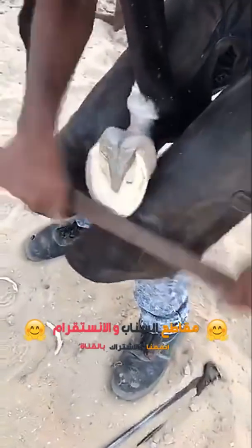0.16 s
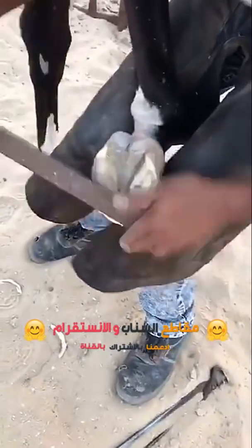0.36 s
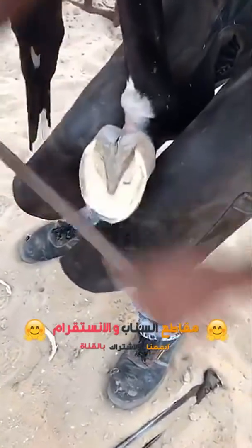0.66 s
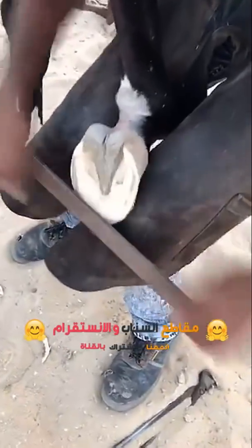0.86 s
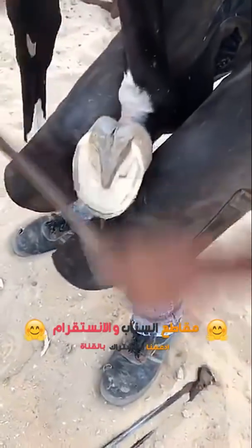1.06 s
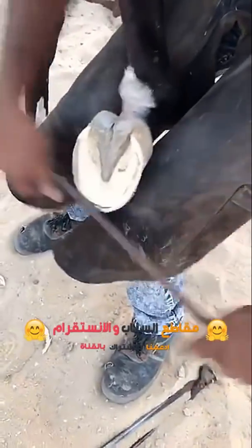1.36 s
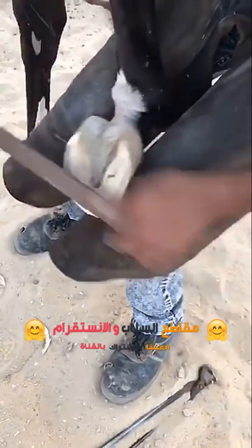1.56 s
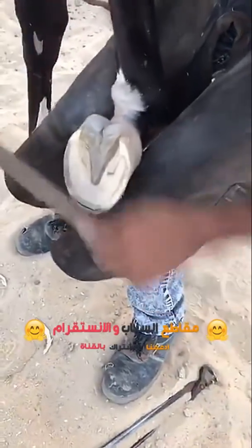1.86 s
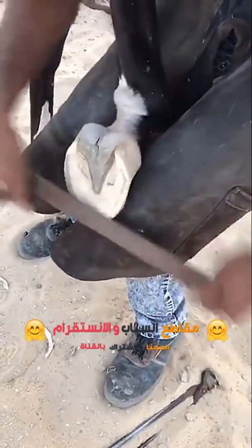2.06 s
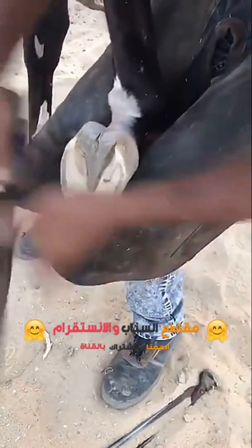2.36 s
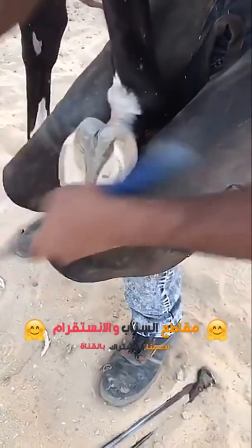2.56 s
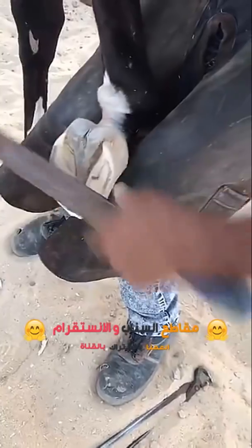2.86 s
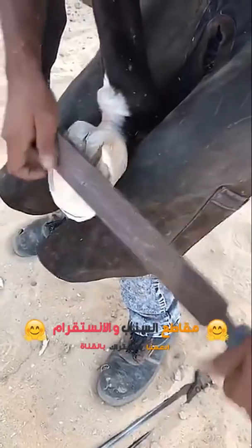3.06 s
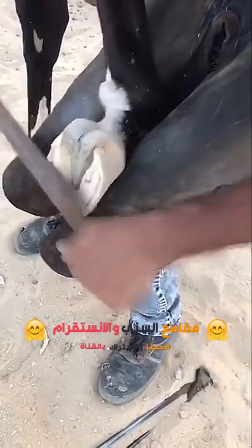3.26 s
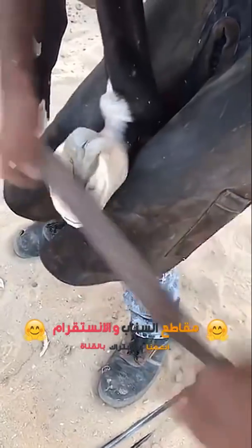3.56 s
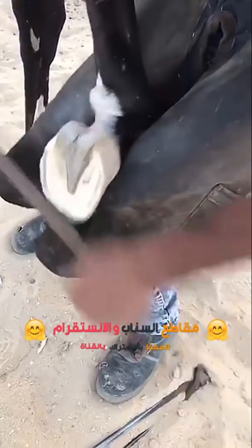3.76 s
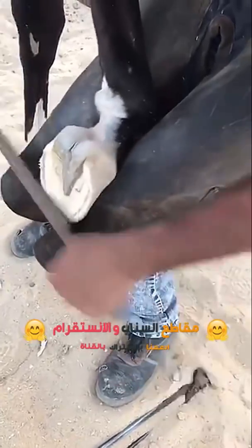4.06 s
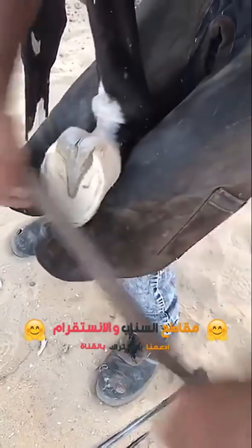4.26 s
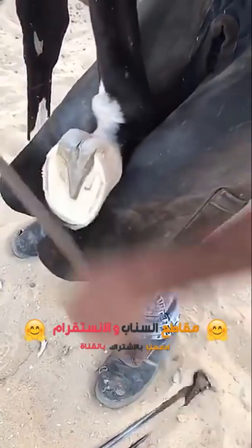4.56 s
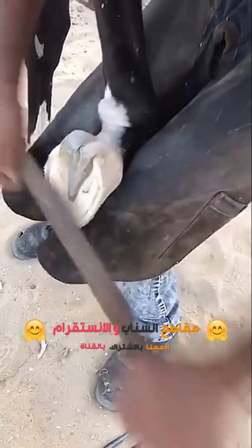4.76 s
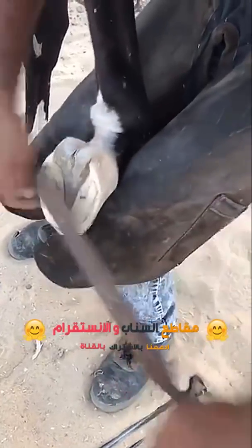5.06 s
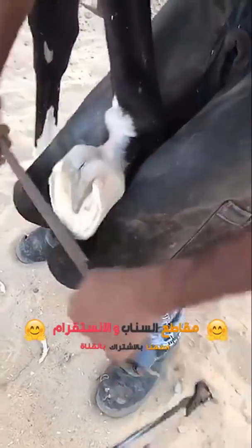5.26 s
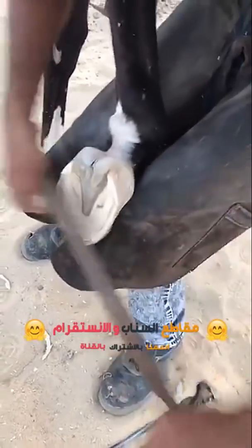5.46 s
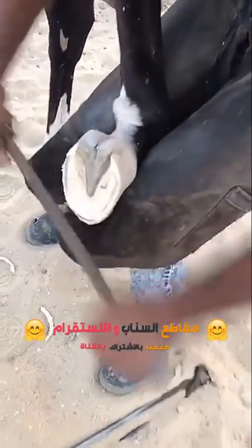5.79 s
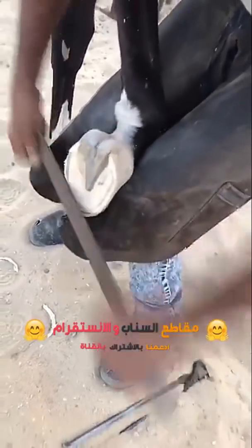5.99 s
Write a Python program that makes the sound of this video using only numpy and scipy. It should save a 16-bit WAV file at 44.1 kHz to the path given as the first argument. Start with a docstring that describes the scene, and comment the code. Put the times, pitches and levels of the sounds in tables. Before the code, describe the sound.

A long steel rasp scrapes a horse's hoof in short, crunchy, evenly spaced strokes while gusty wind rumbles and thumps against the microphone outdoors.

```python
"""Outdoors, close to a phone: a farrier levels a horse's hoof with a long flat rasp, six strokes, a pause, eight more.
Rows of teeth chip the horn as coloured noise and ring the bar's decaying modes; brief sines make it squeal.
Noise bursts give the ticks of steel and dull knocks on the apron; soft swells of noise are rubbing hands and tool.
Wind is ragged low noise in gusts, with single slaps on the microphone, over a faint open-air hiss."""
import sys
import numpy as np
from scipy import signal
from scipy.fft import rfft, irfft, next_fast_len
from scipy.io import wavfile
from scipy.ndimage import uniform_filter1d

SR = 44100
rng = np.random.default_rng(int(sys.argv[2]) if len(sys.argv) > 2 else 0)


def generate_wav(signal):
    """Clip the signal to [-1, 1] and save it as 16-bit WAV at the path in sys.argv[1]."""
    frames = np.transpose(np.atleast_2d(signal))
    scaled = np.clip(frames, -1, 1) * 32767
    pcm = np.round(scaled).astype(np.int16)
    wavfile.write(sys.argv[1], SR, pcm)


N = 270313  # length in samples
TIME = np.arange(N) / SR  # s
REGRIP_S = 2.6  # the second grip begins


def undb(db):
    """Decibels to gain."""
    return 10 ** (np.asarray(db) / 20)


def unit(x):
    """Scale to rms 1."""
    return x / np.sqrt(np.mean(x ** 2))


def white():
    """White noise as long as the scene."""
    return rng.standard_normal(N)


def colour(x, points):
    """Filter by a spectrum of (f/Hz, level/dB) points, joined along log frequency."""
    hz, db = np.transpose(points)
    size = next_fast_len(len(x) + 4096)
    bins = np.arange(size // 2 + 1) * SR / size
    gain = undb(np.interp(np.log(bins + 1), np.log(hz), db))
    return irfft(rfft(x, size) * gain, size)[:len(x)]


def part(x, hz, kind):
    """The lows or highs of x, without phase shift."""
    sos = signal.butter(4, hz, kind, fs=SR, output="sos")
    return signal.sosfiltfilt(sos, x)


def walk(rate):
    """Smooth chance of spread 1 that changes rate times a second."""
    step = max(int(SR / rate), 2)
    values = rng.standard_normal(N // step + 1)
    return unit(uniform_filter1d(np.repeat(values, step)[:N], step))


def ring(x, hz, t60):
    """One decaying mode driven by x; white noise keeps its power."""
    pole = np.exp((2j * np.pi * hz - np.log(1000) / t60) / SR)
    return signal.lfilter([1], [1, -pole], x).real * np.sqrt(2 * (1 - abs(pole) ** 2))


def add(out, s, x):
    """Mix x into out from time s on."""
    i = max(int(s * SR), 0)
    out[i:i + len(x)] += x[:N - i]


def burst(decay_s):
    """A short crack of noise with an exponential decay."""
    t = TIME[:SR // 10]
    return rng.standard_normal(len(t)) * np.exp(-t / decay_s)


# gusts on the microphone: [peak t/s, rise/s, fall/s, rumble level/dB, small-eddy level/dB before the wind's trim]
GUST_LIST = [(0.13, 0.045, 0.15, -26, -41.5), (0.283, 0.056, 0.073, -21.5, -33),
             (0.407, 0.024, 0.043, -17, -26), (0.57, 0.15, 0.063, -24.5, -37.5),
             (0.702, 0.015, 0.13, -26.5, -28.5), (0.819, 0.028, 0.028, -18.5, -39),
             (0.98, 0.083, 0.063, -18.5, -31), (1.02, 0.023, 0.067, -22, -33),
             (1.168, 0.044, 0.013, -24.0, -29), (1.28, 0.051, 0.12, -25, -40.5),
             (1.449, 0.083, 0.046, -25, -25.5), (1.566, 0.16, 0.061, -22.5, -28.5),
             (1.658, 0.022, 0.018, -22.5, -54.5), (1.881, 0.079, 0.02, -24.5, -31.5),
             (2.027, 0.084, 0.084, -25.5, -30.5), (2.215, 0.011, 0.02, -13.5, -28.5),
             (2.473, 0.084, 0.023, -24, -38), (2.53, 0.01, 0.042, -21.5, -39),
             (2.709, 0.14, 0.1, -23.5, -37), (2.754, 0.1, 0.036, -35.5, -25.5),
             (2.988, 0.024, 0.081, -23.5, -30), (3.097, 0.011, 0.035, -22.5, -31.0),
             (3.221, 0.036, 0.11, -22.5, -34.5), (3.364, 0.031, 0.062, -24.5, -44),
             (3.711, 0.076, 0.21, -32.5, -39.5), (3.875, 0.034, 0.083, -19.5, -37),
             (4.009, 0.032, 0.059, -22, -27.5), (4.077, 0.034, 0.036, -22, -30),
             (4.173, 0.013, 0.024, -28, -22.5), (4.286, 0.044, 0.023, -11.5, -21.5),
             (4.374, 0.062, 0.039, -25.5, -31.5), (4.501, 0.032, 0.051, -21, -33),
             (4.685, 0.035, 0.074, -20.5, -31), (4.827, 0.022, 0.047, -24, -31.5),
             (5.005, 0.039, 0.056, -21.5, -24), (5.135, 0.049, 0.065, -17, -24),
             (5.32, 0.083, 0.15, -32.5, -47), (5.429, 0.015, 0.084, -18.5, -23.5),
             (5.585, 0.035, 0.093, -19, -26), (5.731, 0.045, 0.051, -20, -31),
             (5.887, 0.076, 0.09, -19, -22.5), (6.009, 0.048, 0.071, -24.5, -32.5)]


def gusts(shape=2.21, lull_rumble_db=-35.5, lull_eddy_db=-54):
    """Gusts rise and fall over a light breeze, their powers adding: dB of the rumble and of the small eddies."""
    rumble, eddies = undb(lull_rumble_db) ** 2, undb(lull_eddy_db) ** 2
    for s, rise_s, fall_s, rumble_db, eddy_db in GUST_LIST:
        # shape 1 is a sharp peak, 2 a round bell
        swell = np.exp(-np.abs((TIME - s) / np.where(TIME < s, rise_s, fall_s)) ** shape)
        rumble = rumble + (undb(rumble_db) * swell) ** 2
        eddies = eddies + (undb(eddy_db) * swell) ** 2
    return 10 * np.log10(rumble), 10 * np.log10(eddies)


def turbulence(spectrum, hold_s, patchy_db, patch_rate, steady=0.99):
    """Ragged pressure swings of the given colour, of similar strength from one moment to the next."""
    x = colour(white() * undb(patchy_db * walk(patch_rate)), spectrum)
    hold = int(hold_s * SR)
    power = np.abs(uniform_filter1d(uniform_filter1d(x ** 2, hold), hold)) + 1e-18
    return unit(x / power ** (steady / 2))


# relative spectra of large, small and finest eddies: [f/Hz, level/dB]
RUMBLE_COLOUR = [(15, -20), (30, 1.5), (50, 5.5), (80, 0), (120, -6.5), (180, -16.5), (300, -35.5),
                 (600, -71), (2400, -130)]
EDDY_COLOUR = [(60, -30.5), (130, 4.5), (220, 2.5), (350, -5), (550, -17.5), (900, -34.5), (1500, -55),
               (4000, -110)]
FLUTTER_COLOUR = [(150, 0.5), (400, 15.5), (700, 1.5), (1200, -17.5), (1800, -18.5), (2600, -54),
                  (5000, -100)]


def wind(eddy_trim_db=0.5, hard_gust_db=-23, flutter_db=-34, growth=2.4):
    """Large eddies rumble; small ones come in ragged clusters, and the finest stand out in the hardest gusts."""
    rumble_db, eddy_db = gusts()
    rumble = turbulence(RUMBLE_COLOUR, hold_s=0.027, patchy_db=3.5, patch_rate=50)
    eddies = turbulence(EDDY_COLOUR, hold_s=0.043, patchy_db=6, patch_rate=130)
    flutter = turbulence(FLUTTER_COLOUR, hold_s=0.012, patchy_db=5, patch_rate=200)
    # flutter grows 2.4 dB for each dB of gust, reaching flutter_db in a gust of hard_gust_db
    flutter_gain = undb(flutter_db + growth * (eddy_db - hard_gust_db))
    return rumble * undb(rumble_db) + eddies * undb(eddy_db + eddy_trim_db) + flutter * flutter_gain


# relative spectrum of the open air: [f/Hz, level/dB]
AIR_COLOUR = [(120, 10), (250, -8.5), (450, 2.5), (700, 4.5), (1000, -8), (1500, -7), (2300, -11.5),
              (3400, -12.5), (5000, -17), (10000, -21.5), (15000, -30.5)]


def air(level_db=-54.5):
    """Faint, steady open-air hiss of coloured noise."""
    return unit(colour(white(), AIR_COLOUR)) * undb(level_db)


# pushes of the rasp, levels relative: [start t/s, length/s, mid-stroke level/dB, arch: drop at both ends/dB,
# lean toward the end/dB, fine dust hiss/dB, hoof body/dB]
PUSHES = [(0.127, .15, -39, 4, 6, -4, 2.5), (.532, .11, -39, 4.5, 2, 1.5, 1),
          (0.912, 0.099, -40.5, 1.5, 0, 2, -3), (1.289, 0.12, -40, 0, 5.5, 4, -6.5),
          (1.695, .11, -38, 3, 2.5, 0.5, -6), (2.062, 0.15, -41.5, 6.5, 0, -2, -1.5),
          (3.247, 0.12, -31, 7, 6, -2.5, 2), (3.682, 0.098, -30, 0.5, 2.5, -8, -0.5),
          (4.079, 0.1, -34, 6, -1.2, 2, 0), (4.469, .111, -33.5, 2.5, -0.5, -1, -1.5),
          (4.862, 0.1, -36.5, 4.5, 0, -0.5, 0), (5.26, 0.13, -37.5, 6, -3, -3, 0),
          (5.665, .12, -38.5, 5, 0.5, 2.5, 1), (6.067, 0.11, -43, 3, 2, -1.5, 3.5)]


def arm(ragged_db=1.35, ragged_rate=55, touch_s=0.033, touch_ramp_s=.005, bite_db_per_s=593, lift_db_per_s=492):
    """Each push bites, swells in an arch and lifts off: pressure, travel 0-1, and the dust and body dB of its angle."""
    push, travel, dust, body = np.zeros((4, N))
    for start, length, db, arch_db, lean_db, dust_db, body_db in PUSHES:
        on = (TIME > start - .08) & (TIME < start + length + .1)
        t = TIME[on] - start
        travel[on] = np.clip(t / length, 0, 1)
        along = 2 * travel[on] - 1  # -1 at the start of the push, 1 at its end
        edges = bite_db_per_s * np.maximum(-t, 0) + lift_db_per_s * np.maximum(t - length, 0)
        # steel first meets horn touch_s before the cut starts
        touching = np.clip((t + touch_s) / touch_ramp_s, 0, 1)
        push[on] = touching * undb(db + lean_db * along - arch_db * along ** 2 - edges)
        dust[on], body[on] = dust_db, body_db
    return push * undb(ragged_db * walk(ragged_rate)), travel, dust, body


def teeth(speed, row_hz=1050, uneven=.09, chip_db=0.5, row_share=0.21, chatter_db=0.6):
    """Rows of teeth pass faster with the arm's speed; each row breaks off chips of random size."""
    phase = np.cumsum(row_hz * speed * (1 + uneven * walk(300))) / SR  # in rows passed
    rows = np.diff(np.floor(phase), prepend=0) * undb(chip_db * walk(1500))
    chips = white() * undb(chip_db * walk(2500)) * np.exp(-(phase % 1) / 0.77)
    grind = row_share * unit(rows - rows.mean()) + unit(chips)
    return grind * undb(chatter_db * walk(170))


def slide(force, travel, start_s=.0022, end_s=0.0012, echo=0.28):
    """Each bite returns from the end of the bar, sooner as the stroke goes on, so the colour sweeps upward."""
    lag = start_s + (end_s - start_s) * travel
    source = np.maximum(np.arange(N) - (lag * SR).astype(int), 0)
    return force + echo * force[source]


def shifting(force, size=1024, spread_db=2.4):
    """The contact patch keeps changing, so narrow bands of the scrape swell and sink on their own."""
    cells = signal.stft(force, nperseg=size)[2]
    drift = rng.standard_normal(cells.shape)
    for axis in (0, 1):  # smooth over frequency, then time
        drift = uniform_filter1d(drift, size=6, axis=axis)
    return signal.istft(cells * undb(spread_db * unit(drift)), nperseg=size)[1][:N]


# bending modes of the steel bar: [f/Hz, t60/s, relative level/dB in the first grip, the same in the second grip]
BAR_MODES = [(1390, 0.033, -8, -9.5), (1624, .02, -24, -2), (2204, 0.048, -24, -15),
             (2735, 0.042, -4.5, -6.5), (3375, 0.035, 0.5, -1), (4325, 0.031, 1, -3.5),
             (5385, 0.038, -2, -1), (5497, 0.041, -2, -5), (6490, 0.028, -3, -1), (7800, 0.023, -13, -10),
             (9100, .02, -15, -13), (11700, .08, -9.5, -19), (12200, .06, -25, -23), (12530, .05, -15, -24),
             (13880, .05, -15, -31)]


def bar(force, wander_db=7.5):
    """The steel rings; each mode is driven more or less as the contact slides through its nodes."""
    out = 0
    for hz, t60, first_db, second_db in BAR_MODES:
        db = np.where(TIME < REGRIP_S, first_db, second_db) + wander_db * np.clip(walk(45), -2, 1)
        out = out + ring(force * undb(db), hz, t60)
    return out


# relative spectra of the horn's crunch in each grip: [f/Hz, level/dB]
CRUNCH_FIRST = [(300, -5.5), (750, 6), (1050, -3), (1900, -2.5), (2800, 9), (3750, -1), (5000, -1.5),
                (6700, -2.5), (7400, -13.5), (10000, -14.5), (13000, -22), (15500, -49)]
CRUNCH_SECOND = [(300, -2), (700, 3.5), (1060, -2), (1450, -3), (2000, -5), (3000, 1.5), (3900, -6.5),
                 (5900, -1.5), (6700, -5), (7400, -17), (10000, -20), (13000, -27.5), (15500, -30.5)]


def rasp(horn_db=-4, bar_db=-14, dust_db=6, dust_per_speed_db=6, edge_per_speed_db=8):
    """Each push cuts the horn, faster in mid stroke, and shakes the bar."""
    push, travel, dust, body = arm()
    speed = .6 + .4 * np.sin(np.pi * travel)
    first_grip = TIME < REGRIP_S
    force = unit(shifting(slide(teeth(speed), travel)))
    # faster teeth bite more sharply
    edge = part(force, 4800, "high")
    force = force + edge * (undb(edge_per_speed_db * (speed - 1)) - 1)
    first, second = unit(colour(force, CRUNCH_FIRST)), unit(colour(force, CRUNCH_SECOND))
    horn = np.where(first_grip, first, second)
    # fine dust hisses most at full speed
    fine, low = part(horn, 7300, "high"), part(horn, 2300, "low")
    fine_gain = undb(dust + dust_db + dust_per_speed_db * (speed - 0.5))
    # along each push the hoof's body comes up in the first grip and sinks a little in the second
    low_gain = undb(body + np.where(first_grip, 7.5, -2) * travel)
    horn = horn - fine - low + fine * fine_gain + low * low_gain
    return undb(horn_db) * push * horn + undb(bar_db) * bar(force * push)


# dull knocks of hand and tool on the leather apron: [t/s, level/dB before colouring]
KNOCK_LIST = [(0.096, -33), (2.578, -40), (3.024, -36.5)]


def knocks(decay_s=0.007):
    """Short, damped bumps: noise bursts weighted to the lows."""
    out = np.zeros(N)
    for s, db in KNOCK_LIST:
        add(out, s, undb(db) * burst(decay_s))
    return colour(out, [(200, 10), (900, 14), (2200, 2.5), (3500, -11.5), (6000, -16), (14000, -26)])


# the bar sings briefly in one mode: [peak t/s, f/Hz, level/dB before roughening, half length/s]
SQUEAL_LIST = [(.205, 2150, -43, 0.015), (0.23, 11470, -45, 0.017), (.235, 12530, -47, .014),
               (.215, 13880, -60, 0.016), (.6, 13880, -60, .016), (0.616, 11420, -39, .014),
               (0.619, 12530, -53, .018), (0.645, 11920, -57, 0.032), (0.957, 2700, -49, 0.011),
               (.96, 11490, -64, .02), (1.013, 3400, -39.5, 0.009), (1.376, 13880, -48, 0.022),
               (1.405, 11820, -40, 0.0091), (1.399, 4250, -38, .02), (1.419, 3410, -39, 0.016),
               (1.426, 11920, -53, .02), (1.787, 13880, -57, .016), (1.807, 11600, -48, .02),
               (1.849, 11500, -63, 0.027), (2.187, 11450, -46.5, 0.022)]


def squeals(rough_db=2.5):
    """Friction locks onto one mode for a moment: a sine under a bell, with a rough level."""
    out = np.zeros(N)
    for s, hz, db, half_s in SQUEAL_LIST:
        near = np.abs(TIME - s) < 4 * half_s
        t = TIME[near] - s
        out[near] += undb(db) * np.exp(-(t / half_s) ** 2) * np.sin(2 * np.pi * hz * t)
    return out * undb(rough_db * walk(140))


# soft rubbing while the rasp is drawn back or gripped anew: [peak t/s, half length/s, level/dB]
RUB_LIST = [(0.351, 0.026, -51.5), (.71, 0.021, -59), (2.89, 0.088, -66), (3.05, 0.14, -59.5)]
# relative spectrum of the rubbing: [f/Hz, level/dB]
RUB_COLOUR = [(1000, -2), (2400, -11), (3400, -4), (4600, -19), (7000, -17.5), (14000, -31)]


def rubs():
    """Light sliding contact that swells and fades without cutting."""
    swell = sum(undb(db) * np.exp(-((TIME - s) / half_s) ** 2) for s, half_s, db in RUB_LIST)
    return swell * unit(colour(white(), RUB_COLOUR))


# single eddies that slap the microphone, levels before low-pass: [t/s, swing level/dB, sharp front level/dB]
BUFFET_LIST = [(0.386, -9, -34), (0.407, -11, -38), (.423, -10, -27), (0.692, -12, -42), (0.733, -12, -39),
               (0.768, -12, -59), (0.821, -17, -63), (0.972, -13, -35), (1.164, -10.5, -32),
               (1.308, -14, -57), (1.462, -11, -29), (1.513, -8, -23), (1.569, -11.5, -32),
               (1.873, -6.5, -30), (2.036, -11.5, -36), (2.213, -8, -39), (2.678, -9, -46),
               (2.72, -17, -30.5), (2.977, -11, -39), (3.09, -29, -36), (3.864, -6, -61), (3.986, -8, -51),
               (4.01, -20.5, -34), (4.166, -13, -29), (4.272, -18, -29), (4.295, -17, -21.5),
               (4.656, -30, -52), (4.829, -23, -36), (5.004, -12.5, -37), (5.017, -15, -18),
               (5.134, -6, -24), (5.424, -5.5, -27), (5.444, -31, -14.5), (5.461, -18, -18.5),
               (5.521, -9.5, -27.5), (5.576, -7.5, -41), (5.857, -27, -20.5), (5.878, -7, -15.5),
               (5.923, -38, -53), (5.956, -8.5, -13.5)]


def buffets(width_s=0.0018, front_hz=650, front_s=0.00095):
    """An eddy crosses the port: one swing of pressure, with a sharp flick at its front."""
    out, t = np.zeros(N), TIME[:SR // 20]
    for s, swing_db, sharp_db in BUFFET_LIST:
        size, pitch, side = rng.standard_normal(3)  # each eddy varies; side sets its polarity
        u = t / (width_s * np.exp(size / 8))
        swing = u ** 2 * (3 - u) * np.exp(-u)
        flick_hz = front_hz * np.exp(pitch / 8)
        front = 2 * np.sin(2 * np.pi * flick_hz * t) * np.exp(-t / front_s)
        add(out, s, np.sign(side) * (undb(swing_db) * swing - undb(sharp_db) * front))
    return part(out, 1610, "low")


# the bar is set down, or a tooth catches: [t/s, level/dB before colouring, relative ring level/dB, contact decay/s]
TICK_LIST = [(0.494, -39.5, -11, 0.0033), (.856, -59, 3.5, .003), (1.382, -25.5, -5, 0.004),
             (1.614, -47, -3, 0.017), (1.777, -29, -2.5, 0.0089), (2.05, -30.5, -11, .004),
             (2.179, -27, -4, 0.0046), (2.435, -68, 4, 0.014), (2.517, -55, 2, 0.032),
             (2.804, -53, 8.5, 0.0057), (3.123, -44.5, 2, 0.016), (3.221, -29.5, 0, 0.0021),
             (3.466, -41, 1, 0.0089), (3.866, -45, -1, 0.0064), (4.003, -42, 5.5, 0.0046),
             (4.483, -22.5, 5, 0.0024), (5.188, -44.5, -3, 0.01)]


def ticks(ring_db=-10):
    """Steel meets horn: a crack, then the bar's ring."""
    cracks, blows = np.zeros(N), np.zeros(N)
    for s, db, steel_db, decay_s in TICK_LIST:
        crack = undb(db) * burst(decay_s)
        add(cracks, s, crack)
        add(blows, s, crack * undb(steel_db))
    steel = colour(bar(blows), [(2000, -16), (5400, -2), (6600, -3), (9000, -23)])
    contact = colour(cracks, [(500, -4), (3000, 1), (6500, -25), (9000, -11), (15000, -23.5)])
    return contact + undb(ring_db) * steel


def scene():
    """Rasp and handling in front, wind on the single microphone."""
    outdoors = wind() + air() + buffets()
    work = rasp() + knocks() + squeals() + rubs() + ticks()
    return (outdoors + work)[None]


def record(dry, top_hz=15200):
    """The phone cuts the top with a steep low-pass."""
    return signal.sosfilt(signal.ellip(10, .2, 80, top_hz, fs=SR, output="sos"), dry)


dry = scene()
out = record(dry)
generate_wav(out)
```